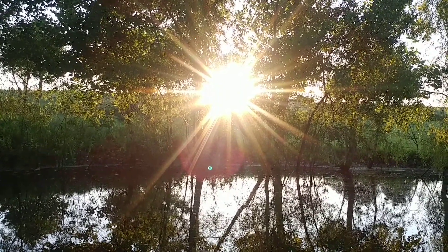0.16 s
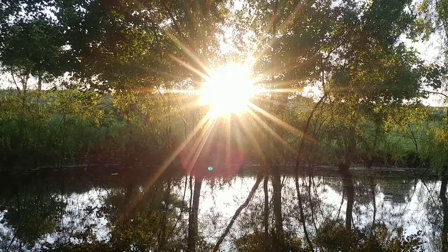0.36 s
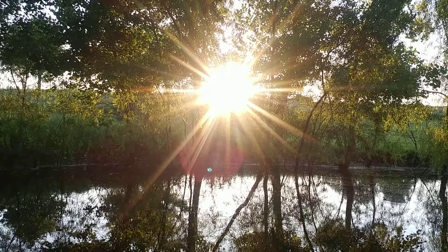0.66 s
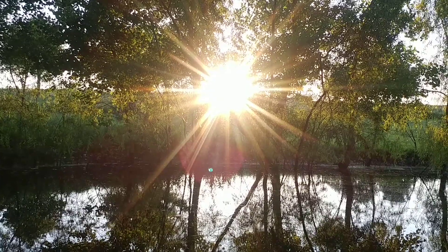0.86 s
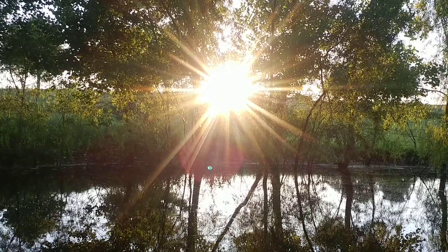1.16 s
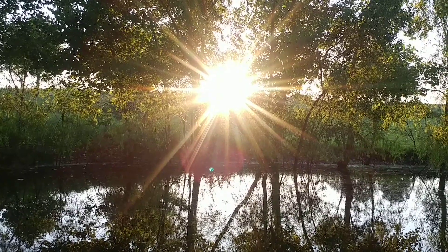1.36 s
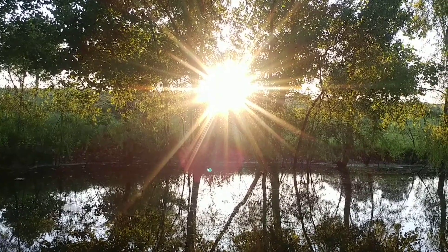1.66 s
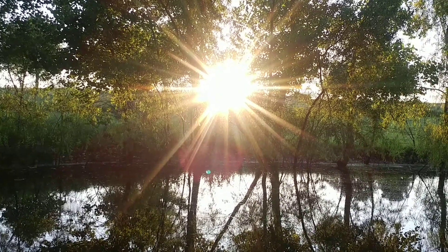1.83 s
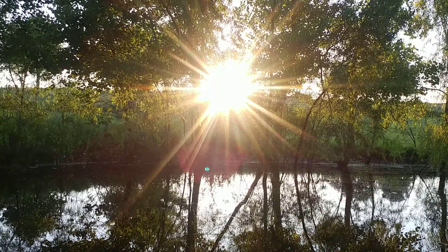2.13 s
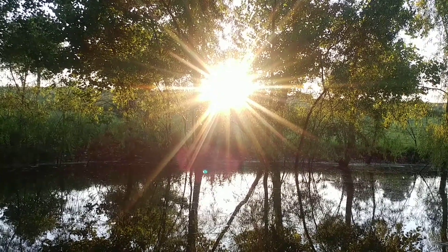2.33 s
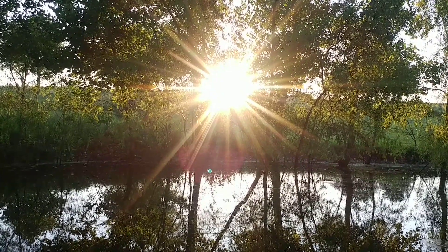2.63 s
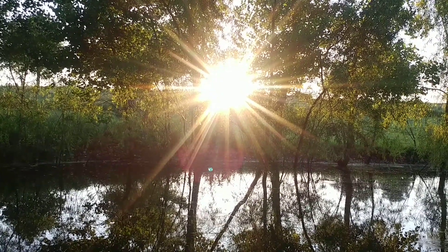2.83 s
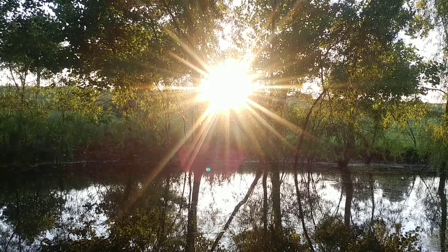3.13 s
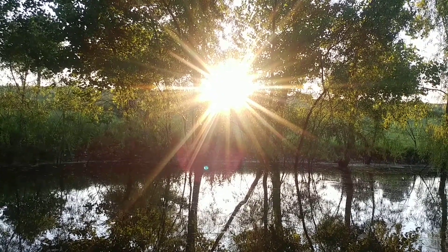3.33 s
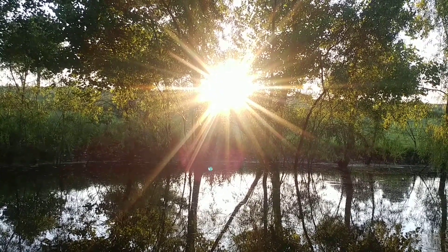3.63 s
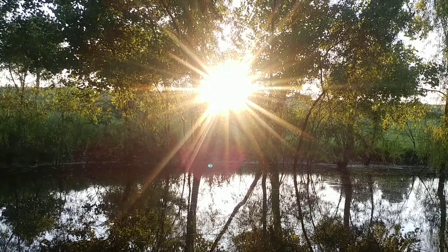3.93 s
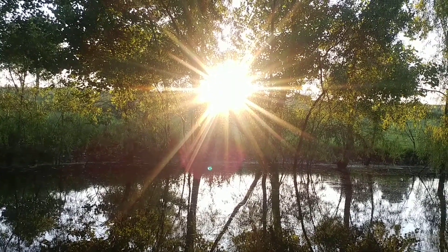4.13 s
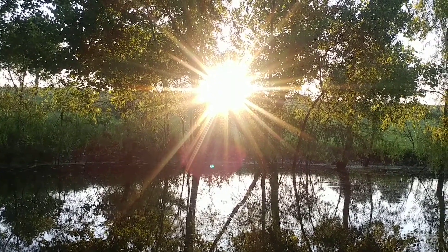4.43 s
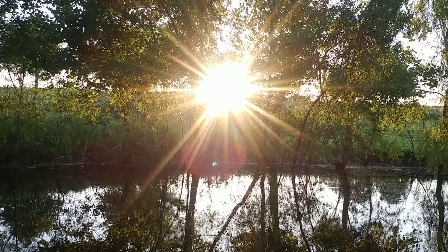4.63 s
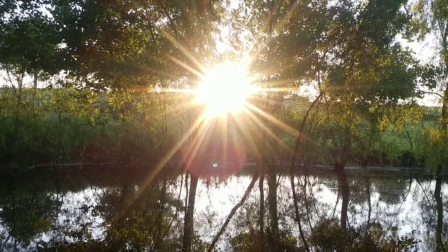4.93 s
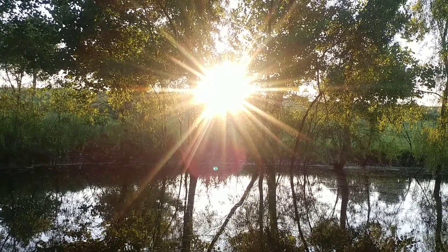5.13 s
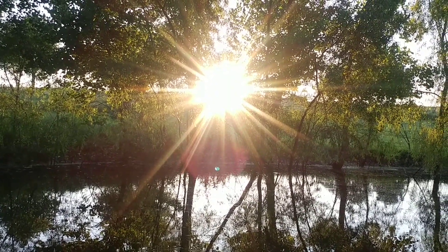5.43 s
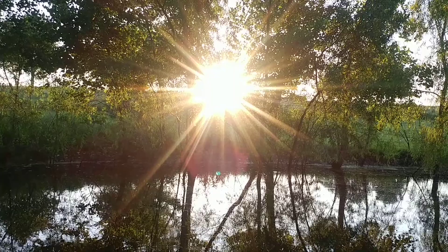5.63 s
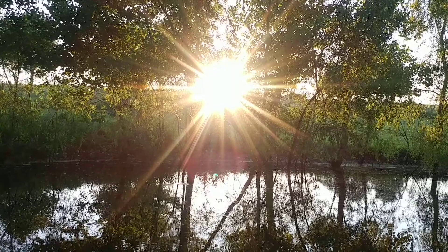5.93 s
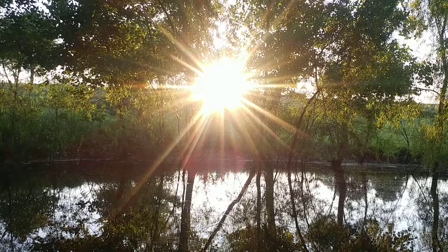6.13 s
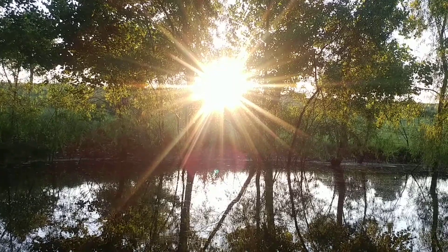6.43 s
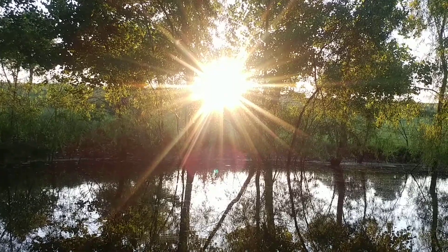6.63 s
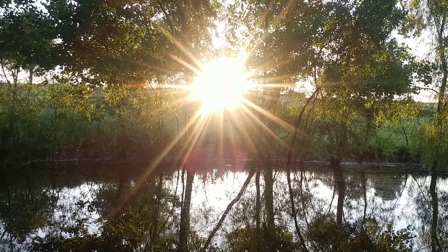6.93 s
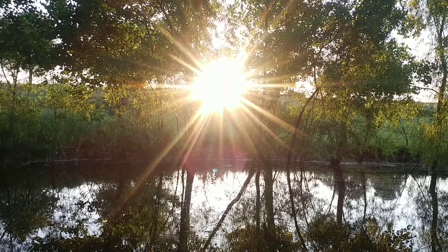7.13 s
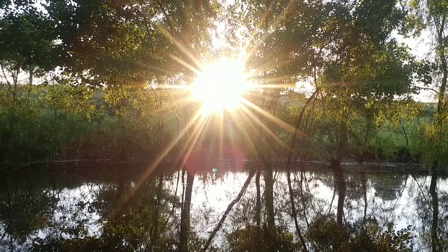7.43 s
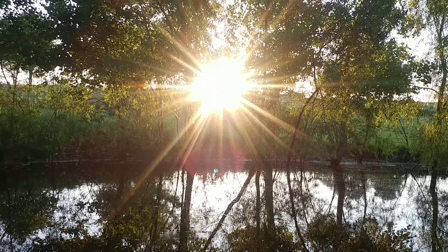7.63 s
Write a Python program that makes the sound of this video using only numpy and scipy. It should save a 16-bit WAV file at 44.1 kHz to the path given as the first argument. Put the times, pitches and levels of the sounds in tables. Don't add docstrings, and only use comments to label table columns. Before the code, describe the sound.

Outdoors at the water's edge, a continuous blurred cicada chorus shimmers in high bands. Quiet frog creaks tick in doublets through the first half. One closer cicada swells and jabs five times before holding a sharp, unwavering buzz to the end. A short arched caw echoes slightly among trees just after the buzz settles. Distant traffic is a weak rumble; the handheld stereo microphone hears different brightness on each side.

```python
import sys
import numpy as np
from scipy import signal
from scipy.fft import rfft, irfft, next_fast_len
from scipy.io import wavfile
from scipy.ndimage import uniform_filter1d, map_coordinates

SR = 44100
rng = np.random.default_rng(int(sys.argv[2]) if len(sys.argv) > 2 else 0)


def transcribe(signal):
    frames = np.atleast_2d(signal).T
    limited = np.clip(frames, -1, 1)
    pcm = np.round(limited * 32767).astype(np.int16)
    wavfile.write(sys.argv[1], SR, pcm)


def nominal_scale(level):
    x = np.asarray(level, float) / 20
    return 10 ** x


N = 342657
TIME_S = np.arange(N) / SR

# [start_s, effort_db]
STEADY_BUZZ = [(3.47, -31), (4.0, -32), (4.6, -30.5), (6.2, -31), (7.0, -32), (7.77, -34)]


def unit(x):
    return x / np.sqrt(np.mean(x ** 2) + 1e-20)


def along(f, v, hz):
    return np.interp(np.log(hz + 1), np.log(f + 1), v, left=v[0] - 30, right=v[-1] - 30)


def curves(rows):
    s, *cols = np.transpose(rows)
    return [np.interp(TIME_S, s, c) for c in cols]


def wobble(rate_hz):
    knots = rng.standard_normal(int(N * rate_hz / SR) + 4)
    return map_coordinates(knots, [np.arange(N) * rate_hz / SR])


def filtered(x, response):
    m = next_fast_len(N + SR // 2)
    return irfft(rfft(x, m) * response(np.fft.rfftfreq(m, 1 / SR)), m)[..., :N]


def phase(hz):
    return 2 * np.pi * np.cumsum(hz) / SR


def clicks(at, size):
    tap = np.floor(at)[:, None] + np.arange(-7, 9)
    offset = tap - at[:, None]
    pulse = size[:, None] * np.sinc(offset) * np.cos(np.pi * offset / 16) ** 2
    return np.bincount(np.clip(tap, 0, N).astype(int).ravel(), pulse.ravel(), N + 1)[:N]


def lagged(x, lag_s):
    return filtered(x, lambda hz: np.exp(-1j * np.pi * hz * lag_s * np.array([[1], [-1]])))


def trees(x, t60, gap_s):
    t = np.arange(SR) / SR
    tail = rng.standard_normal((2, SR)) * nominal_scale(-60 * t / t60) * np.clip(t / gap_s, 0, 1)
    return signal.fftconvolve(np.atleast_2d(x), tail / np.linalg.norm(tail[0]), axes=1)[:, :N]


def leaves(x, size, hold):
    frames = dict(nperseg=size, noverlap=size * 3 // 4)
    z = signal.stft(x, **frames)[2]
    re, im = uniform_filter1d(rng.standard_normal((2, 2) + z.shape), hold, -1)
    return unit(signal.istft(z * (re + 1j * im), **frames)[1][:, :N])


def ports(x, column):
    # [freq_hz, chorus_left_db, chorus_right_db, singer_left_db, singer_right_db]
    body = [(2400, -108, -108, -118, -118), (3290, -93, -89, -100, -99), (3000, -101, -99, -104, -103),
            (3623, -75.5, -75, -67.5, -68), (4315, -70.5, -69.5, -74.5, -63), (5610, -83, -88.5, -88, -79),
            (7047, -71.5, -66, -55.5, -55.5), (7680, -66, -61.5, -68, -52.5),
            (8443, -72, -63, -63.5, -63.5), (9060, -80.5, -87, -77, -115), (10165, -64, -87, -63.5, -96),
            (11070, -60.5, -68.5, -57.5, -68), (12110, -64, -96, -62, -76),
            (13500, -81, -99.5, -78.5, -140), (16900, -90, -104, -85, -102)]
    f, *colour = np.transpose(body)
    left, right = colour[column:column + 2]
    return unit(filtered(x, lambda hz: nominal_scale([along(f, left, hz), along(f, right, hz)])))


def tymbals(stroke_hz, jitter_s, scatter_db, waver_s=0):
    # [stroke_share, sac_db, membrane_db]
    ribs = [(0, 2, -2.5), (0.134, -34, -8), (0.271, -35, -6.5), (.46, -13, -0.5), (.5, -3.5, -10.5),
            (0.63, -8, -13.5), (0.796, -8, -20)]
    share, sac_db, skin_db = np.transpose(ribs)
    turns = np.cumsum(stroke_hz) / SR + rng.random()
    due = (np.arange(1, int(turns[-1]))[:, None] + share).ravel()
    luck = rng.standard_normal((len(due), 2))
    at = np.interp(due, turns, np.arange(N)) + jitter_s * SR * luck[:, 0]
    lag = np.interp(at, np.arange(N), np.broadcast_to(waver_s, N)) * SR
    luck_db = scatter_db * luck[:, 1]
    sac = clicks(at, nominal_scale(np.resize(sac_db, len(due)) + luck_db))
    skin = clicks(at + lag, nominal_scale(np.resize(skin_db, len(due)) + luck_db))
    return skin + filtered(sac - skin, lambda hz: hz < 5400)


def rumble():
    # [freq_hz, density_db]
    spectrum = [(21, -41), (36, -14.5), (65, -5.5), (81, 1.5), (94, -4.5), (108, -7), (178, -15.5),
                (201, -17.5), (292, -27.5), (775, -28.5), (1580, -38), (2500, -33), (3250, -86),
                (5500, -120)]
    # [start_s, level_db]
    traffic = [(0, -58.5), (1.6, -57.5), (3.2, -56), (4.8, -55), (5.7, -58), (7.77, -57)]
    # [freq_hz, likeness (-1 to 1)]
    likeness = [(60, 0.97), (270, 1), (450, 0.44), (900, 0.0075)]
    f, db = np.transpose(spectrum)

    def mid_side(hz):
        angle = np.arccos(np.clip(np.interp(hz, *np.transpose(likeness)), -1, 1)) / 2
        return nominal_scale(along(f, db, hz)) * [np.cos(angle), np.sin(angle)]

    mid, side = filtered(rng.standard_normal((2, N)), mid_side)
    air = unit(np.array([mid + side, mid - side])) * nominal_scale([[-.3], [.3]])
    bass = filtered(air, lambda hz: 1 / (1 + (hz / 200) ** 4))
    bass_db = curves(traffic)[0] + 0.5 * wobble(5.46) + 0.91 * wobble(2.37)
    return bass * nominal_scale(bass_db) + (air - bass) * nominal_scale(-55)


def haze():
    hiss = filtered(rng.standard_normal((2, N)), lambda hz: (hz > 8700) * (hz < 13200))
    return unit(hiss) * nominal_scale([[-52], [-45]])


def whine():
    # [start_s, pitch_hz, level_db]
    far_tone = [(.6, 1500, -96), (.8, 1520, -86), (1.9, 1534, -90), (2.1, 1530, -110)]
    hz, db = curves(far_tone)
    return nominal_scale(db + 5.8 * wobble(12)) * np.sin(phase(hz + 6 * wobble(24)))


def chorus():
    # [start_s, level_db]
    swell = [(0, -27), (.3, -28.5), (1, -28), (1.7, -29), (3.5, -28), (5.5, -27), (7.77, -25)]
    crowd = 0
    for hz in 150 + 14 * rng.standard_normal(6):
        one = tymbals(hz * (1 + .004 * wobble(2)), jitter_s=5e-5, scatter_db=2.2)
        crowd = crowd + one * nominal_scale(1.5 * wobble(3))
    crowd = unit(crowd)
    direct = nominal_scale(-8.5) * lagged(crowd, lag_s=-0.0004056)
    crowd = ports(direct + leaves(crowd, size=2048, hold=3), column=0)
    high = filtered(crowd, lambda hz: hz > 9100)
    beat = np.sin(phase(10.0 + 1.3 * wobble(0.49)))
    chorus_db = curves(swell)[0] + .4 * wobble(5)
    return nominal_scale(chorus_db) * (crowd - high + high * nominal_scale(0.3 * beat))


def pond():
    # [start_s, first_db, second_db]
    frog = [(.199, -60, -80), (.756, -60, -60), (1.022, -57, -57), (1.276, -59, -56.5), (1.542, -57, -67),
            (2.333, -64, -64), (2.595, -58, -56), (2.844, -56, -57), (3.11, -58, -55), (3.404, -59, -58),
            (4.03, -57, -80), (4.298, -57, -56), (4.562, -57, -60)]
    # [start_s, peak_db, pitch_hz]
    bubble = [
        (3.411, -56, 527),
    ]
    sac_hz, spread_hz, second_s = 2362, 20, .061
    x, t = np.zeros(N + SR), np.arange(SR // 10) / SR
    train = .5 - .5 * np.cos(2 * np.pi * 65 * t)
    swell = t / 0.0094 * np.exp(1 - t / 0.0051)
    creaks = [(s + k * second_s, pair[k]) for s, *pair in frog for k in range(2)]
    for s, db in creaks:
        hz = sac_hz + spread_hz * rng.standard_normal()
        ring = np.sin(2 * np.pi * hz * t * (1 - 0.98 * t))
        x[round(s * SR):][:len(t)] += nominal_scale(db + 6.0) * swell * train * ring
    wet = x[:N] * nominal_scale(-3) + nominal_scale(3.5) * trees(x[:N], t60=0.15, gap_s=0.0033)
    for s, db, hz in bubble:
        ring = t / .018 * np.exp(1 - t / 0.01) * np.sin(2 * np.pi * hz * t * (1 + t))
        wet[:, round(s * SR):][:, :len(t)] += nominal_scale(db) * ring
    return wet


def caw():
    # [start_s, pitch_hz, level_db]
    arch = [
        (4.04, 512, -86),
        (4.06, 542, -56),
        (4.09, 584, -51),
        (4.125, 601.4, -50),
        (4.165, 570, -51),
        (4.2, 515, -58),
        (4.225, 500, -76),
    ]
    # [harmonic_number, level_db]
    orders = [(1, -18), (2, -2.5), (3, -1), (4, -20), (5, -24)]
    pitch_hz, db = curves(arch)
    turn = phase(pitch_hz * (1 + 0.004 * wobble(70)))
    slack_db = np.minimum(pitch_hz - 570, 0) * 0.048
    voice = sum(nominal_scale(g + (k - 4.5) * slack_db) * np.sin(k * turn) for k, g in orders)
    call = nominal_scale(db + 1.8 * wobble(72)) * (db > -74.9) * voice
    return nominal_scale(8) * lagged(call, lag_s=-3.6e-4) + nominal_scale(1) * trees(call, t60=.5, gap_s=.07)


def effort():
    # [middle_s, effort_db, hold_s]
    throbs = [
        (1.84, -35.5, 0.056),
        (2.226, -29.5, 0.041),
        (2.577, -31, 0.043),
        (2.93, -33, 0.094),
        (3.251, -32, .12),
    ]
    # [middle_s, effort_db]
    jab_rows = [
        (2.035, -34),
        (2.37, -33),
        (2.735, -33),
        (3.075, -30.5),
        (3.395, -30.5),
    ]

    def hump(s, db, hold, rise, fall):
        before_s = np.clip(s - hold / 2 - TIME_S, 0, 9)
        after_s = np.clip(TIME_S - s - hold / 2, 0, 9)
        return db - rise * before_s - fall * after_s

    steady = curves(STEADY_BUZZ)[0] - 170 * np.clip(STEADY_BUZZ[0][0] - TIME_S, 0, 9)
    swells = [hump(s, db, hold, rise=310, fall=180) for s, db, hold in throbs]
    jabs = [hump(s, db, 0.0072, rise=1800, fall=450) for s, db in jab_rows]
    flutter_db = -0.24 * wobble(14)
    return np.max([steady, *swells, *jabs], axis=0) + flutter_db


def singer():
    # [start_s, stroke_hz]
    strokes = [(1.7, 156), (2.3, 156), (3.2, 155.5), (3.8, 154), (4.2, 152.4), (5, 152.12), (7.77, 152.2)]
    # [harmonic_number, level_db against effort]
    sac_tones = [(18, -48), (19, -52), (20, -44), (22, -31), (24, -29), (26, -25), (28, -21), (29, -22)]
    sac_lag_s, skin_lag_s = -2.7e-4, -3.6e-4
    effort_db = effort()
    stroke_hz = curves(strokes)[0] * (1 + 0.000732 * wobble(6))
    turn = phase(stroke_hz)
    warm_db = 1.6 * (stroke_hz - stroke_hz[-1])
    tones = sum(nominal_scale(db + 1.3 * wobble(5) - warm_db) * np.sin(k * turn) for k, db in sac_tones)
    buzz = unit(tymbals(stroke_hz, jitter_s=1.5e-5, scatter_db=.6, waver_s=7e-5 * wobble(24)))
    scattered = filtered(leaves(buzz, size=2048, hold=14), lambda hz: 1 / (1 + (3400 / (hz + 1)) ** 12))
    low = filtered(buzz, lambda hz: hz < 5400)
    heard = lagged(buzz - low, skin_lag_s) + nominal_scale(-8.5) * lagged(low, sac_lag_s) + nominal_scale(-1) * scattered
    rung = filtered(heard, lambda hz: 1 + 1.18 / (1 + ((hz - 4270) / 70) ** 2))
    song = ports(rung, column=2)
    top = filtered(song, lambda hz: hz > 9100)
    shrill_db = 0.7 + 0.52 * (TIME_S - STEADY_BUZZ[0][0])
    return nominal_scale(effort_db + 5) * (song - top + top * nominal_scale(shrill_db) + lagged(tones, sac_lag_s))


def scene():
    return rumble() + haze() + whine() + chorus() + pond() + caw() + singer()


def top_cut(x):
    return signal.sosfilt(signal.butter(12, 15700, fs=SR, output="sos"), x)


def record(dry):
    heard = filtered(dry, lambda hz: [hz >= 0, hz < 13100])
    return top_cut(heard)


dry = scene()
out = record(dry)
transcribe(out)
```